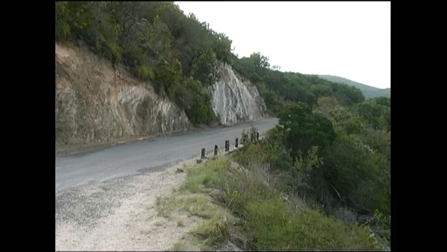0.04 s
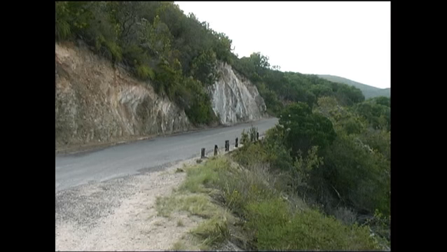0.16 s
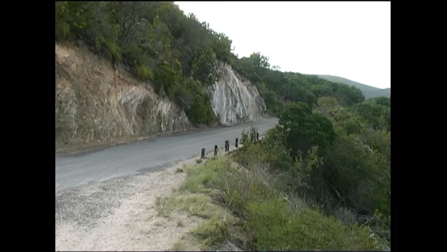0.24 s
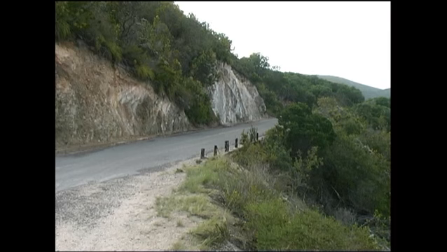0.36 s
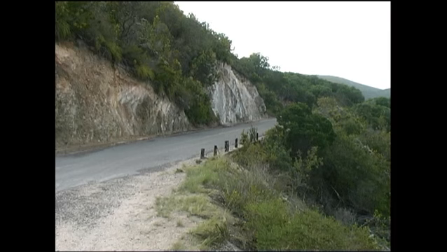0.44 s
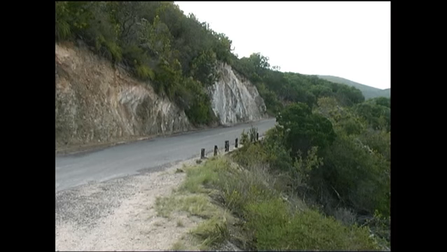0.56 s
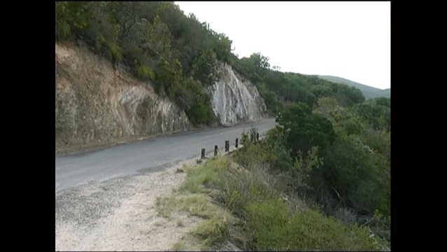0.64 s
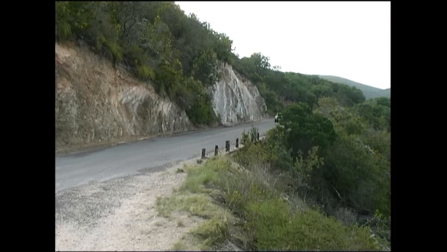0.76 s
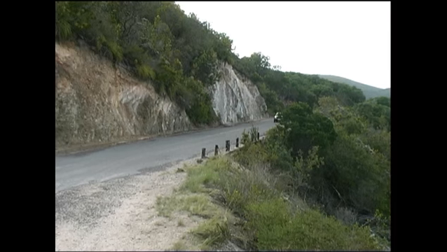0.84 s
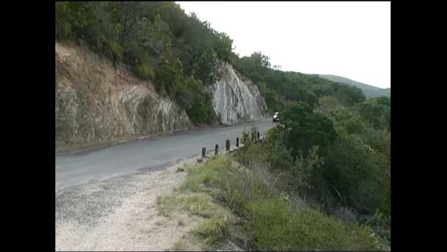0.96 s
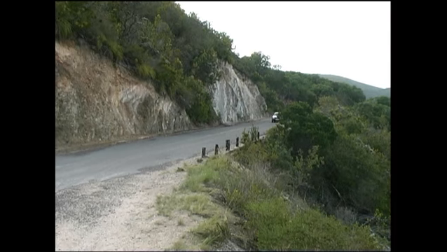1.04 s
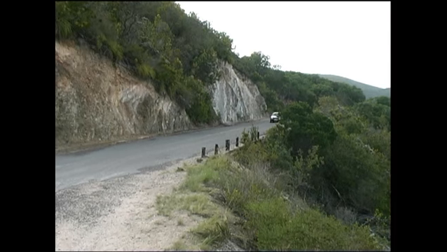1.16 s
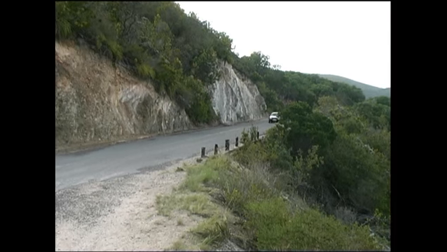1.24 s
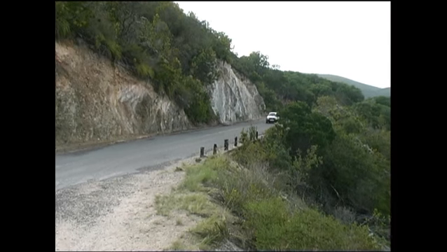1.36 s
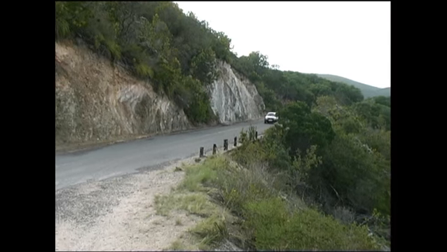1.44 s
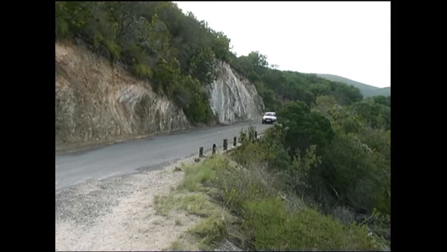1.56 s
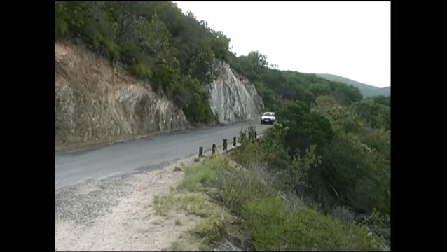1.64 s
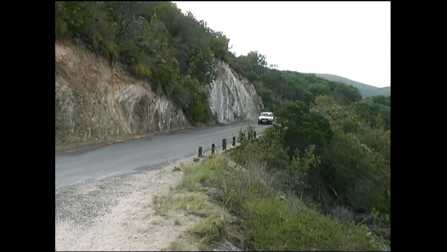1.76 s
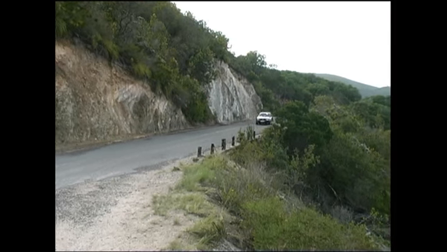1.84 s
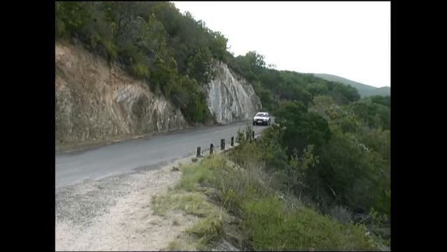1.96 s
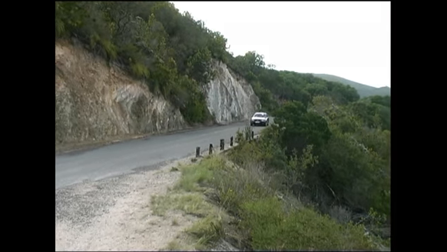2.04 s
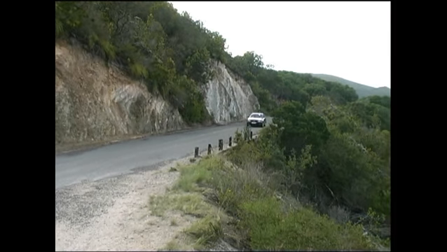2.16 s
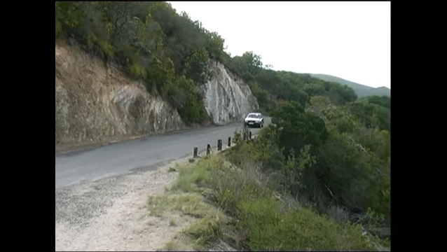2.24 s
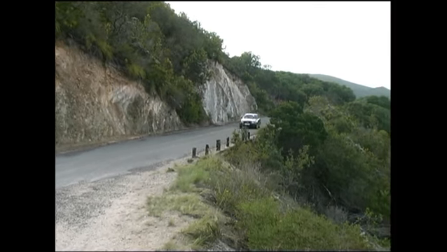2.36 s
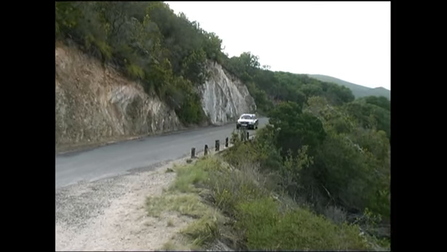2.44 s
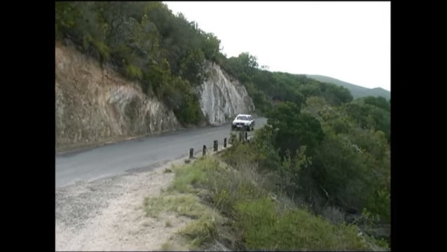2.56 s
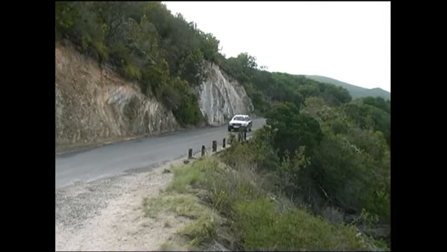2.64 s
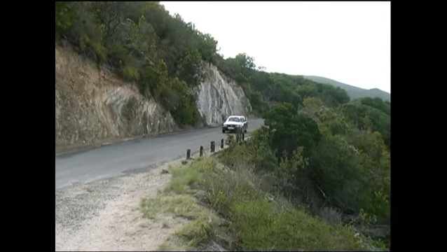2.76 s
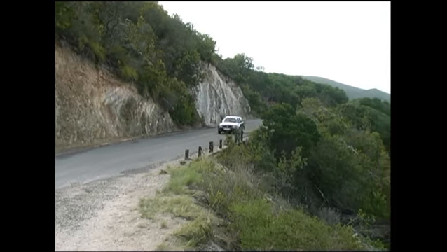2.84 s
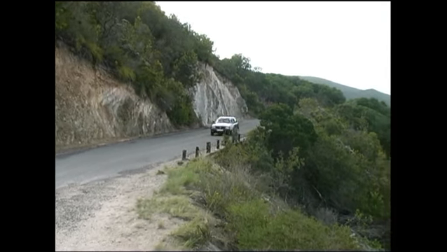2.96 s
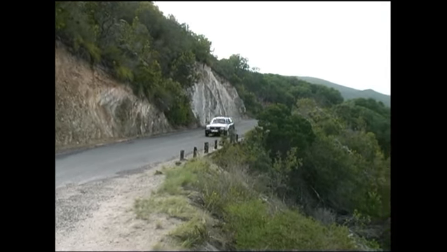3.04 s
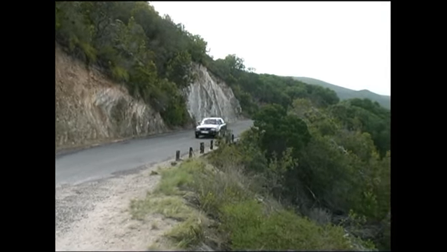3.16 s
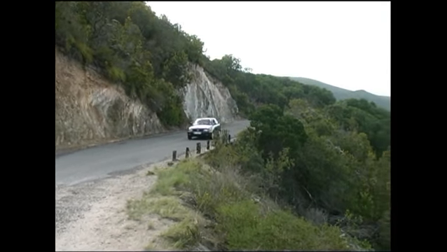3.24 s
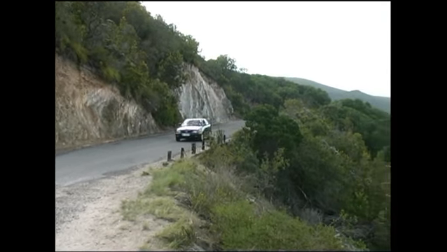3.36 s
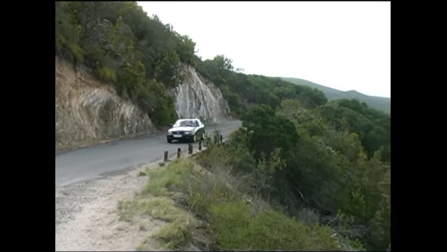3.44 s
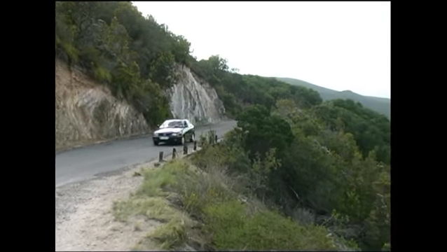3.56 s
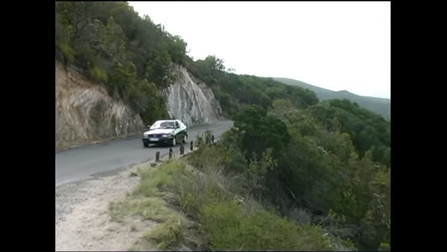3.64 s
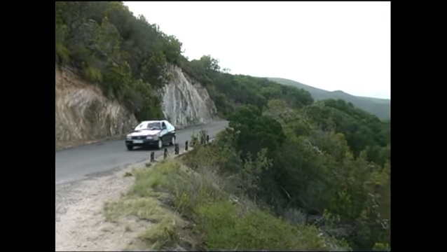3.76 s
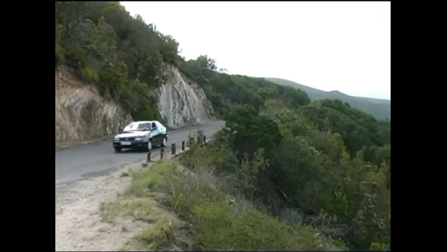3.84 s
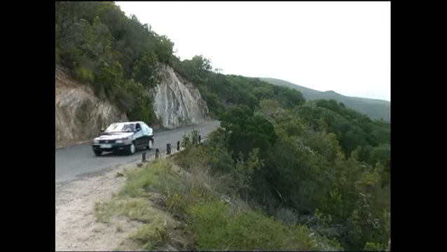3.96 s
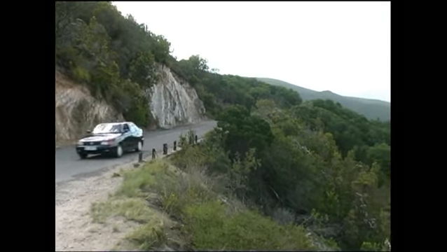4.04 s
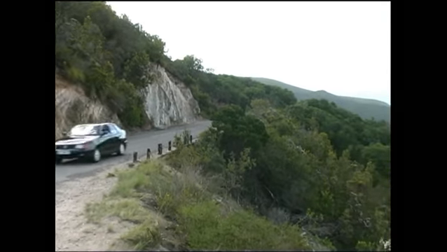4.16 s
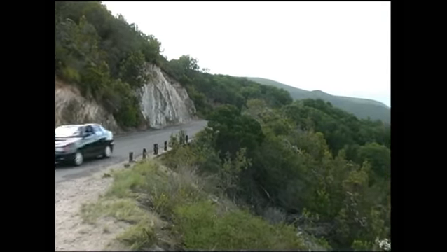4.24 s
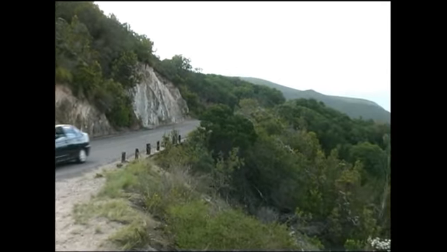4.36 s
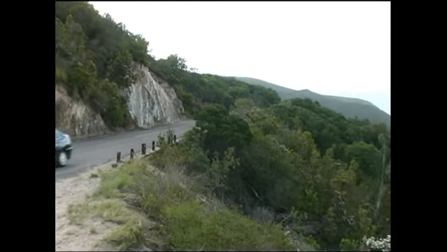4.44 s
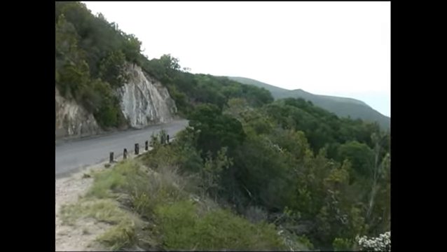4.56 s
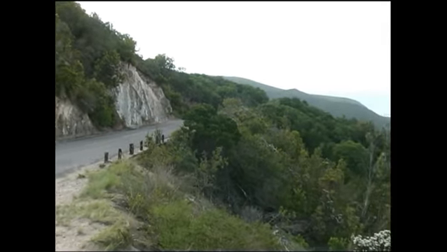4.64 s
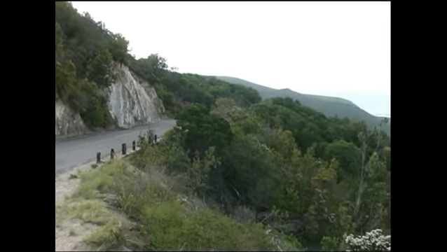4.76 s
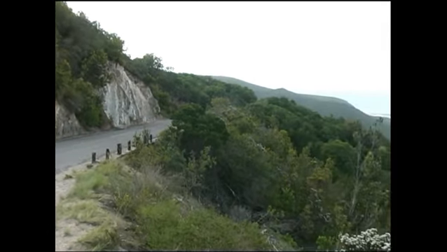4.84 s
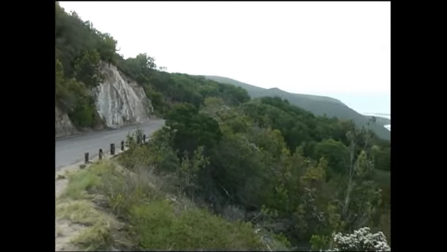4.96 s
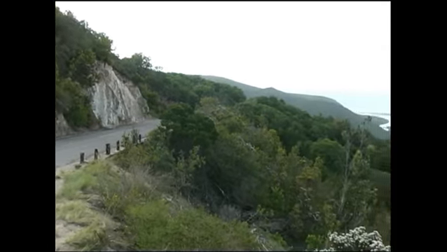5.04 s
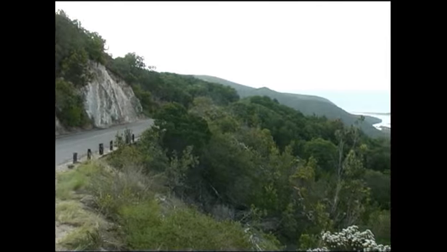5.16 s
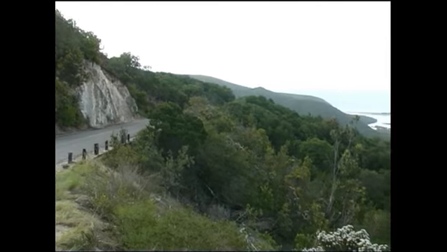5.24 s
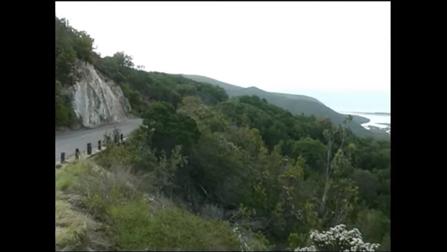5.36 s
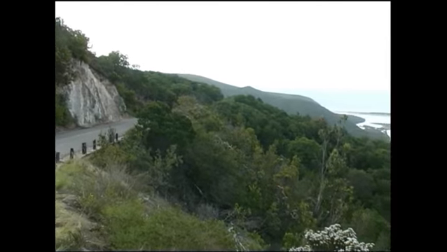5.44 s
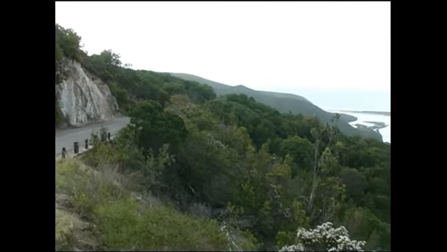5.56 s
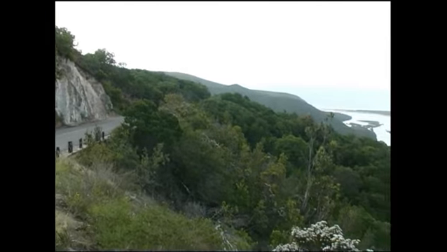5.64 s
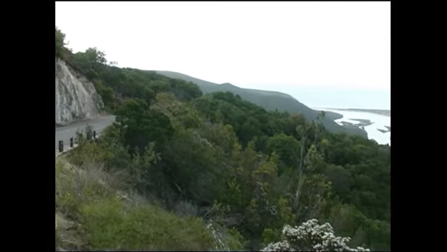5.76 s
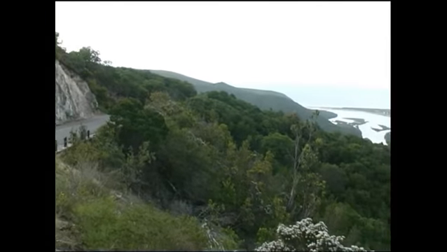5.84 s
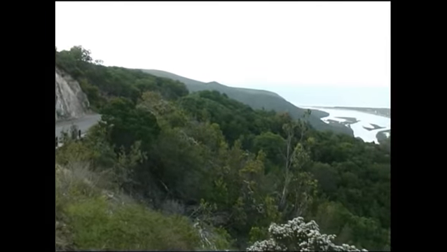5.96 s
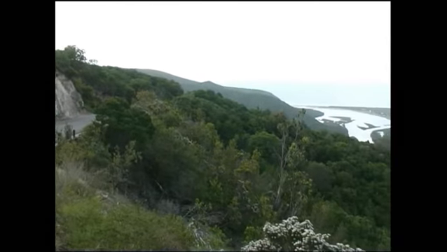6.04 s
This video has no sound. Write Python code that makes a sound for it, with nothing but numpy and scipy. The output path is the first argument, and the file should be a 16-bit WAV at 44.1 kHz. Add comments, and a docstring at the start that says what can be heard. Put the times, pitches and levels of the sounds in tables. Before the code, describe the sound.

Stereo outdoor pass-by at the roadside: soft tyre hiss and weak engine hum approach at moderate speed, with brief bird calls and a barely audible cricket. Bright stone clicks pepper the swelling roar. After the nearest point the pitch sags slightly, the exhaust opens into a deep steady drone with heavy rumbling air, and everything begins to recede under high bird peeps.

```python
"""Hillside road: a car comes down, passes close on the left of the microphone and goes on behind it.
Tyre roar, body rumble and deep thunder are shaped noise that swells with nearness.
The exhaust is a Doppler-shifted firing tone with overtones; it booms once the tailpipe faces the microphone.
Tyre grit snaps as bright bursts with brief rings; birds whistle in gliding tones.
A faint cricket rasps in the scrub: a throbbing narrow band of noise."""
import sys
import numpy as np
from scipy import signal
from scipy.io import wavfile
from scipy.ndimage import uniform_filter1d

SR = 44100
rng = np.random.default_rng(int(sys.argv[2]) if len(sys.argv) > 2 else 0)


def log_audio(samples):
    """Write samples as a 16-bit WAV file to the path given in sys.argv[1]."""
    # one column per channel
    frames = np.atleast_2d(samples).T
    # limit to full scale, then quantise
    limited = np.clip(frames, -1, 1)
    pcm = np.round(limited * 32767).astype(np.int16)
    wavfile.write(sys.argv[1], SR, pcm)


N = 268789

# Tyre roar, relative spectral density: freq_hz, far_ahead_db, near_ahead_db, abreast_db, just_past_db, behind_db
TYRE_SPECTRUM = [(403, -4, -9, -2.5, 2, 3.5), (544, -1.5, 5.5, 6.5, 2, 3.5), (680, -4.5, -2.5, 3, 1.5, 3.5),
                 (855, 5, 6.5, 1.5, 2, -2.5), (1085, 4.5, 4.5, 6, 8, 1.5), (1580, 1.5, 3.5, -1, -0.5, 0.5),
                 (1810, -3, 1, -0.5, -2.5, 1), (2560, -2, -0.5, -3.5, -1, 1.5),
                 (4330, -9.5, -6, -8, -10, -6), (5840, -18, -10.5, -10.5, -9.5, -11),
                 (10010, -26.5, -20, -23.5, -25.5, -21), (11350, -36, -31.5, -28.5, -25, -27),
                 (13500, -34.5, -28, -29, -26, -31.0), (15300, -39, -39, -35.5, -39, -35.0)]
# Engine and body rumble, relative spectral density: freq_hz, ahead_db, behind_db
RUMBLE_SPECTRUM = [(30, -33, -35), (58, -2, -7), (89.6, 4, 7), (128, -0.5, -1), (158, 2, -2.5),
                   (236, 0, -1.5), (298, -6, -4), (359, -16.5, -7.5), (506, -6.5, -16.5), (1000, -56, -59)]
# Road thunder and moving air, relative spectral density: freq_hz, level_db
THUNDER_SPECTRUM = [(8, -3), (22, -8), (38, 2), (55, 4), (80, -6), (200, -54)]
# Firing rate at the car; the driver eases off in the bend, then holds the throttle: time_s, firing_hz
FIRING_RATE = [(0.1, 78.8), (2, 80.2), (3.6, 75.3), (4.4, 77.7), (5.3, 77.9)]
# Exhaust overtones, relative to the firing tone: multiple_of_firing_rate, level_db
EXHAUST_OVERTONES = [(1.5, -37), (2, -27), (2.5, -32), (3, -30), (3.5, -42), (4, -33), (5, -46)]
# Stages of the pass (0 far ahead, 1 near ahead, 2 abreast, 3 just past, 4 behind): past_microphone_m, stage
PASS_STAGES = [(-50, -0.5), (-19.5, 1), (-7.5, 1.39), (-1.6, 2), (4, 3), (10, 4.5)]
# Phase lag of the left channel: freq_hz, ahead_rad, abreast_rad, just_past_rad, behind_rad
LEFT_LAG = [(40, 0.32, 0.18, 0.27, 0.22), (120, 0.51, 0.63, 0.53, 0.59), (277, 1.81, 1.15, 1.67, 1.64),
            (433, 2.67, 3.3, 2.53, 2.26), (630, 3.16, 3, 3.15, 3), (764, 4.27, 3.5, 3.57, 2.87),
            (965, 4.7, 4.2, 3.2, 3.1), (1170, 5.14, 4.6, 3.95, 2.8), (1700, 5.44, 4.76, 3.5, 3.8),
            (2500, 5.74, 5.1, 3.8, 4.36), (4500, 6.05, 5.8, 4.1, 3.88), (7200, 6.6, 4.1, 3.7, 4.1),
            (10500, 6.5, 5.9, 4.1, 3.4), (14000, 5.2, 3.3, 4.5, 2.78)]
# Left level minus right: freq_hz, ahead_db, abreast_db, just_past_db, behind_db
LEFT_LEAN = [(40, -1.5, -2.1, -1.6, -1.5), (120, -1.7, -2.3, -2.0, -2.1), (280, -1.7, -3.0, -4.9, -4.1),
             (440, -4.6, -2.3, -3.4, -4.6), (600, -1.3, -2.1, -1.0, -3.5), (750, 2.3, 1.7, 0.8, -2.1),
             (950, 1.0, 5.9, 3.4, 0.0), (1200, 1.8, 6.9, 5.9, 3.3), (1700, 1.5, 8.9, 8.3, 11.1),
             (2500, 0.7, 11.9, 11.6, 7.1), (4500, 1.7, 9.1, 8.7, 3.6), (7500, 1.2, 12.0, 6.0, 3.4),
             (10500, -1.5, 0.9, 8.5, -0.4), (14000, -0.1, 2.4, 3.2, -0.9)]
# Left-right likeness, 0-1: freq_hz, ahead, abreast, just_past, behind
LIKENESS = [(40, 0.994, 0.981, 0.994, 0.999), (280, 0.956, 0.985, 0.979, 0.989),
            (600, 0.952, 0.954, 0.972, 0.971), (950, 0.921, 0.892, 0.96, 0.972),
            (1700, 0.928, 0.806, 0.822, 0.684), (4500, 0.9, 0.734, 0.601, 0.84),
            (7500, 0.878, 0.269, 0.65, 0.665), (14000, 0.527, 0.46, 0.541, 0.548)]
# Rising whistles of one bird: start_s, length_s, start_hz, end_hz, level_db
BIRD_WHISTLES = [(.552, .058, 3550, 4300, -51), (1.378, .155, 2520, 4380, -45.5),
                 (5.841, .145, 2706, 3990, -43)]
# Thin high peeps of another: start_s, length_s, start_hz, end_hz, level_db
BIRD_PEEPS = [(5.735, .032, 5450, 5800, -45), (5.876, .022, 6550, 6850, -46),
              (5.975, 0.042, 6450, 7300, -49)]
# Quick chips of a third, off to the side: start_s, start_hz, end_hz, level_db
BIRD_CHIPS = [(1.285, 3400, 2450, -55), (1.37, 2750, 1950, -57), (1.445, 3000, 4250, -54),
              (1.583, 3450, 2550, -48), (1.622, 3450, 2450, -49), (1.663, 3350, 2300, -48)]
# Grit flicked by the tyres: start_s, level_db, ring_hz, ring_share (0-1)
GRIT_SNAPS = [(3.501, -35, 13000, .2), (3.794, -27.5, 10100, 0.57), (3.875, -37, 13000, .2),
              (4.022, -41, 14480, .5), (4.035, -21.5, 13200, 0.1), (4.047, -31, 9000, 0.6),
              (4.185, -22, 7700, 0.4), (4.191, -27, 13200, .4), (4.340, -30, 13500, .15),
              (4.545, -35, 13500, .3), (4.677, -28.5, 8930, 0.56), (4.830, -33, 10500, .2),
              (4.840, -27, 11300, .5)]

START_S, BAND_LIMIT_HZ = 0.064, 15650
FRAME_SIZE, FRAME_HOP = 2048, 512  # samples
TIME_S = np.arange(N) / SR
FRAME_S = np.arange(N // FRAME_HOP + 2) * FRAME_HOP / SR
BIN_HZ = np.fft.rfftfreq(FRAME_SIZE, 1 / SR)
# Constant speed along a straight line past the microphone
ABREAST_S, SPEED_M_PER_S, MISS_M = 4.985, 12, 6.52
# Base levels at the nearest point, before the steps below
ROAR_DB, RUMBLE_DB, THUNDER_DB, FIRING_DB = -24, -25, -36.5, -24.5
# Level steps: extra_db, past_microphone_m, width_m
PIPE_BOOM_STEP, PIPE_RUMBLE_STEP = (14.7, 0.29, 1.5), (5.3, 10.2, 0.98)  # tailpipe points backwards
WAKE_STEP = (10.4, 3, 2.3)  # air dragged behind the car arrives late
# The bend muffles the far exhaust: level while hidden, then the place where it comes clear
HIDDEN_DB, CLEAR_M, CLEAR_WIDTH_M = -4, -31.5, 0.72
CHIP_LENGTH_S = 0.031
WHISTLE_LAG_RAD, PEEP_LAG_RAD, CHIP_LAG_RAD = 0.99, 1.1, 3  # left channel


def amp(db):
    """Decibels to gain."""
    return 10 ** (np.asarray(db) / 20)


def evened(x):
    """Scales to rms 1."""
    return x / np.sqrt(np.mean(abs(x) ** 2) + 1e-20)


def curve(rows, at):
    """Interpolates each column of a table against its first column."""
    keys, *columns = np.transpose(rows)
    return np.array([np.interp(at, keys, column) for column in columns])


def spectrum(rows, blend=0):
    """Frames x bins from a frequency table; blend slides between columns, counted from 0."""
    hz, *columns = np.transpose(rows)
    blend = np.clip(blend * np.ones(len(FRAME_S)), 0, len(columns) - 1)[:, None]
    total = 0
    for k, column in enumerate(columns):
        weight = np.maximum(1 - abs(blend - k), 0)
        total = total + weight * np.interp(np.log(BIN_HZ + 1), np.log(hz), column)
    return total


def to_frames(x):
    """Short-time spectra, frames x bins."""
    spectra = signal.stft(x, nperseg=FRAME_SIZE, noverlap=FRAME_SIZE - FRAME_HOP)[2]
    return spectra.T[:len(FRAME_S)]


def to_sound(frames):
    """Short-time spectra back to samples."""
    spectra = np.swapaxes(frames, -1, -2)
    return signal.istft(spectra, nperseg=FRAME_SIZE, noverlap=FRAME_SIZE - FRAME_HOP)[1][..., :N]


def drift(rate_hz):
    """Complex random fluctuation of rms 1 with a Gaussian spectrum about 0 Hz."""
    hz = np.fft.fftfreq(N, 1 / SR)
    return evened(np.fft.ifft(np.exp(-(hz / rate_hz) ** 2 + 2j * np.pi * rng.random(N))))


def frame_drift(rate_hz):
    """Real random fluctuation sampled at the frames."""
    return np.interp(FRAME_S, TIME_S, evened(drift(rate_hz).real))


def noise(colour, level_db):
    """Noise frames with the given spectral shape and level."""
    colour = colour / np.sqrt(np.mean(colour ** 2, axis=1, keepdims=True))
    return to_frames(rng.standard_normal(N)) * colour * amp(level_db)[:, None]


def place_m(t):
    """Position past the microphone; negative while approaching."""
    return SPEED_M_PER_S * (t - ABREAST_S)


def distance_m(t):
    """Distance from car to microphone."""
    return np.hypot(place_m(t), MISS_M)


def spreading_db(t, power):
    """Distance loss relative to the nearest point; power 1 is open air."""
    return 20 * power * np.log10(MISS_M / distance_m(t))


def step_db(t, extra_db, from_m, over_m):
    """Smooth level step as the car passes a place on the road."""
    return extra_db * (1 + np.tanh((place_m(t) - from_m) / (2 * over_m))) / 2


def horn_beam_db(horn_hz=1080, horn_octaves=0.55, far_db=0, oblique_db=1.8, side_db=-1.0):
    """Horn resonance between tread and road, its gain set by the viewing angle."""
    side_on = (MISS_M / distance_m(FRAME_S)) ** 2
    beam_db = np.interp(side_on, [0, 0.5, 1], [far_db, oblique_db, side_db])[:, None]
    return beam_db * np.exp(-(np.log2((BIN_HZ + 1) / horn_hz) / horn_octaves) ** 2)


def ground_comb(stage, echo=0.34, echo_s=0.00217, echo_top_hz=2500):
    """Ground echo interferes with the direct sound and cuts comb notches."""
    nearness = np.clip(stage - 1, 0, 1)[:, None] ** 2
    delay_s = echo_s * (1 - 0.22 * nearness)  # the comb slides up as the car draws level
    depth = echo * (1 - 0.5 * nearness) * np.exp(-(BIN_HZ / echo_top_hz) ** 2)
    return abs(1 - depth * np.exp(-2j * np.pi * BIN_HZ * delay_s))


def tyres(stage, low_hz=350, grain_db=0.42, grain_hz=31, patchy_db=0.9, power=0.96):
    """Tread roar: noise through horn and ground comb, roughened by uneven asphalt."""
    shadow_db = step_db(FRAME_S, extra_db=-2.5, from_m=10, over_m=1.8)
    level_db = ROAR_DB + spreading_db(FRAME_S, power) + shadow_db
    comb = ground_comb(stage)
    patches = uniform_filter1d(rng.standard_normal(comb.shape), size=9, axis=0)
    patches = evened(uniform_filter1d(patches, size=22, axis=1))
    low_cut = BIN_HZ ** 2 / np.sqrt(BIN_HZ ** 4 + low_hz ** 4)
    colour = amp(spectrum(TYRE_SPECTRUM, stage) + patchy_db * patches) * comb * low_cut
    return amp(horn_beam_db()) * noise(colour, level_db + grain_db * frame_drift(grain_hz))


def body_rumble(stage, power=1.13, lead_s=0.11):
    """Low engine and body noise; the engine in front makes it lead the car."""
    level_db = RUMBLE_DB + spreading_db(FRAME_S + lead_s, power) + step_db(FRAME_S, *PIPE_RUMBLE_STEP)
    return noise(amp(spectrum(RUMBLE_SPECTRUM, (stage - 1) / 2)), level_db)


def road_thunder(power=0.79, gust_db=1.5, gust_hz=5):
    """Deep gusty noise of road and moving air, raised by the late wake."""
    level_db = THUNDER_DB + spreading_db(FRAME_S, power) + step_db(FRAME_S, *WAKE_STEP)
    return noise(amp(spectrum(THUNDER_SPECTRUM)), level_db + gust_db * frame_drift(gust_hz))


def rolling(stage):
    """Frames of all the car's noise, freshly drawn at each call."""
    return tyres(stage) + body_rumble(stage) + road_thunder()


def exhaust(far_scatter=0.5, near_scatter=0.061, overtone_scatter=0.68, flutter_hz=8, power=0.91):
    """Doppler-shifted firing pulses as tones; random flutter of the firing tone is deeper far ahead."""
    receding_m_per_s = SPEED_M_PER_S * place_m(TIME_S) / distance_m(TIME_S)
    doppler = 343 / (343 + receding_m_per_s)  # speed of sound in m/s
    phase_rad = 2 * np.pi * np.cumsum(curve(FIRING_RATE, TIME_S)[0] * doppler) / SR
    stage = curve(PASS_STAGES, place_m(TIME_S))[0]
    scatter = np.interp(stage, [1, 2], [far_scatter, near_scatter])
    tone = np.exp(1j * phase_rad) * (1 + scatter * drift(flutter_hz)) / np.hypot(1, scatter)
    for multiple, db in EXHAUST_OVERTONES:
        flutter = 1 + overtone_scatter * drift(flutter_hz)
        tone = tone + amp(db) * np.exp(1j * phase_rad * multiple) * flutter
    hidden_db = HIDDEN_DB - step_db(TIME_S, HIDDEN_DB, CLEAR_M, CLEAR_WIDTH_M)
    level_db = FIRING_DB + spreading_db(TIME_S, power) + hidden_db + step_db(TIME_S, *PIPE_BOOM_STEP)
    return to_frames(np.sqrt(2) * tone.real * amp(level_db))


def microphone(direct, scattered, stage):
    """Bearing sets phase and level per channel; scattered sound enters the two with opposite sign."""
    bearing = stage - 1
    same = np.clip(spectrum(LIKENESS, bearing), 0, 1)
    shared = np.sqrt((1 + same) / 2) * direct
    apart = np.sqrt((1 - same) / 2) * scattered
    lean = amp(spectrum(LEFT_LEAN, bearing))
    left = (shared + apart) * lean * np.exp(-1j * spectrum(LEFT_LAG, bearing))
    right = shared - apart
    return to_sound(np.array([left, right]) * np.sqrt(2 / (1 + lean ** 2)))


def cricket(hz=8780, width_hz=150, chirps_per_s=8.7, throb=0.45, level_db=-74):
    """Thin, high rasp: narrow-band noise with a regular throb."""
    chirps = 1 - throb * np.cos(np.pi * chirps_per_s * TIME_S) ** 2
    rasp = (drift(width_hz) * np.exp(2j * np.pi * hz * TIME_S)).real
    return amp(level_db) * evened(chirps * rasp)


def add(mix, start_s, sound):
    """Mixes in a stereo sound."""
    part = mix[:, round(start_s * SR):][:, :sound.shape[1]]
    part += sound[:, :part.shape[1]]


def note(length_s, start_hz, end_hz, level_db, lag_rad, bend=0.1007, waver=0.0055, right_db=2):
    """Bird note: a gliding, slightly wavering tone; rising ones linger in mid-glide."""
    u = np.linspace(0, 1, round(length_s * SR))
    glide = u ** 1.6 + bend * np.sin(2 * np.pi * u) * (end_hz > start_hz)
    wavering = 1 + waver * evened(drift(150).real)[:len(u)]
    hz = start_hz * (end_hz / start_hz) ** glide * wavering
    tone = np.sin(2 * np.pi * np.cumsum(hz) / SR - np.array([[lag_rad], [0]]))
    return amp(level_db) * amp([[0], [right_db]]) * signal.windows.tukey(len(u), 0.3) * tone


def birds(echo_db=-11, echo_decay_s=0.036):
    """Whistles, peeps and chips from the scrub, with a short diffuse echo off the slope."""
    calls = np.zeros((2, N))
    for start_s, *shape in BIRD_WHISTLES:
        add(calls, start_s, note(*shape, WHISTLE_LAG_RAD))
    for start_s, *shape in BIRD_PEEPS:
        add(calls, start_s, note(*shape, PEEP_LAG_RAD))
    for start_s, *shape in BIRD_CHIPS:
        add(calls, start_s, note(CHIP_LENGTH_S, *shape, CHIP_LAG_RAD))
    t = np.arange(SR // 3) / SR
    tail = rng.standard_normal((2, len(t))) * np.exp(-t / echo_decay_s)
    tail = tail / np.linalg.norm(tail[0])
    return calls + amp(echo_db) * signal.fftconvolve(calls, tail, axes=1)[:, :N]


def grit(crack_decay_s=0.0012, ring_decay_s=0.0019, low_hz=3800, top_hz=14600, apart=0.6):
    """Small stones snap from under the tread: a bright noise crack and a brief ring."""
    out = np.zeros((2, N))
    t = np.arange(SR // 20) / SR
    bright = signal.butter(2, [low_hz, top_hz], "band", fs=SR, output="sos")
    for start_s, level_db, ring_hz, ring_share in GRIT_SNAPS:
        burst = rng.standard_normal(len(t)) + apart * rng.standard_normal((2, len(t)))
        crack = signal.sosfilt(bright, burst * np.exp(-t / crack_decay_s))
        cycles = ring_hz * t + 0.21 * rng.random((2, 1))
        ring = np.sin(2 * np.pi * cycles) * np.exp(-t / ring_decay_s)
        add(out, start_s, amp(level_db) * ((1 - ring_share) * crack + ring_share * ring))
    return out


def scene():
    """Car at the stereo microphone, plus cricket, birds and grit."""
    stage = curve(PASS_STAGES, place_m(FRAME_S))[0]
    direct = rolling(stage) + exhaust()
    scattered = rolling(stage)
    return microphone(direct, scattered, stage) + cricket() + birds() + grit()


def record(dry):
    """Silence, a 2 ms fade-in, then the band limit."""
    fade_in = np.clip((TIME_S - START_S) / 0.002, 0, 1)
    low_pass = signal.firwin(511, BAND_LIMIT_HZ, window=("kaiser", 9), fs=SR)
    return signal.oaconvolve(dry * fade_in, low_pass[None], "same")


dry = scene()
out = record(dry)
log_audio(out)
```